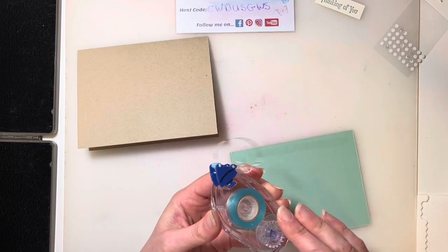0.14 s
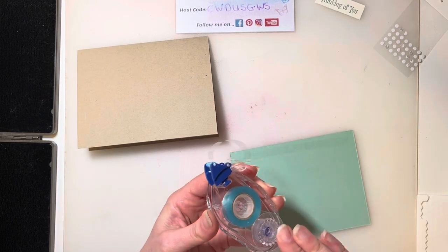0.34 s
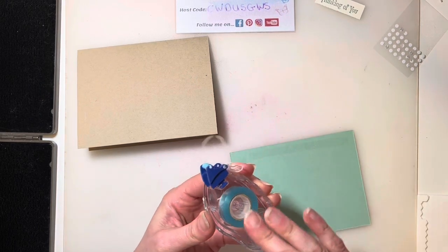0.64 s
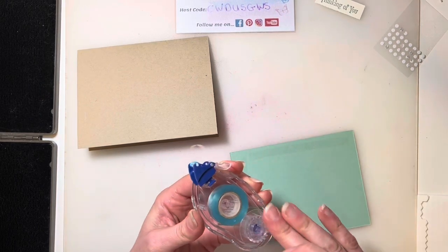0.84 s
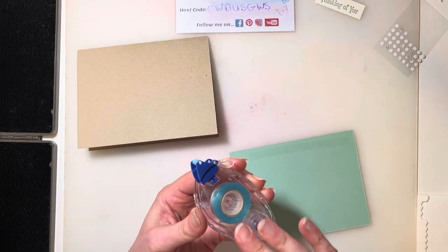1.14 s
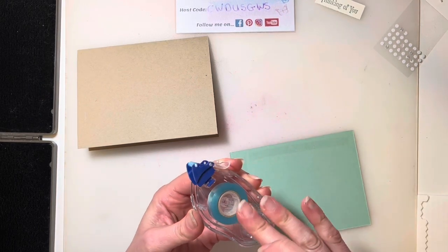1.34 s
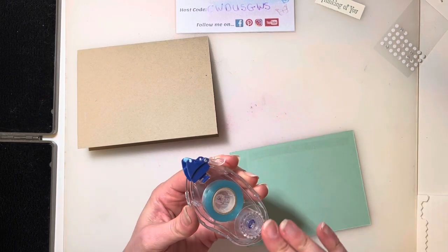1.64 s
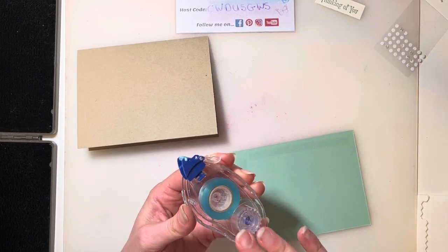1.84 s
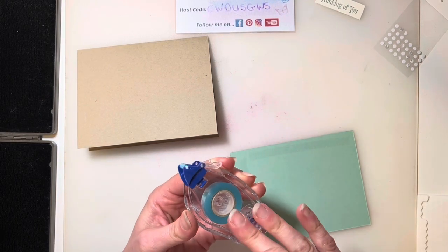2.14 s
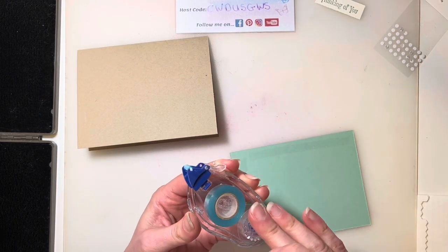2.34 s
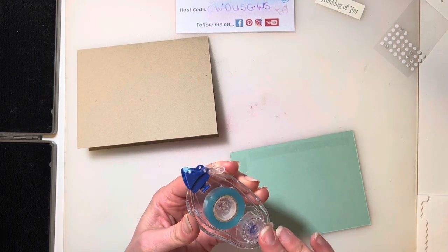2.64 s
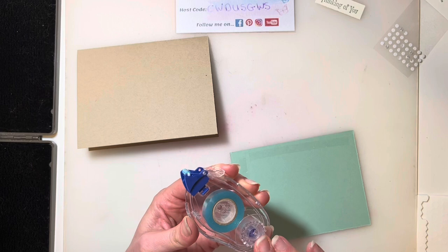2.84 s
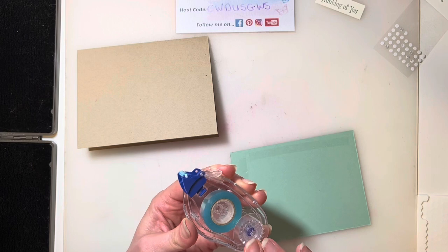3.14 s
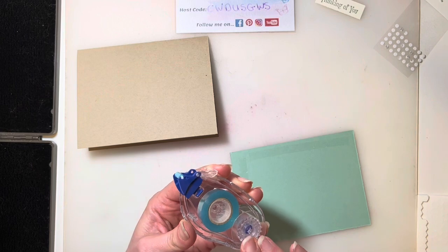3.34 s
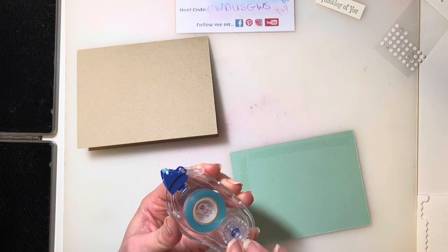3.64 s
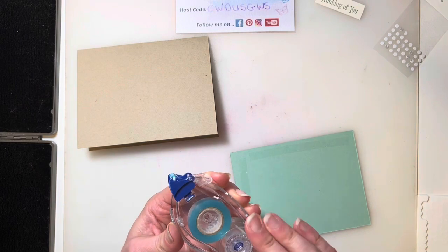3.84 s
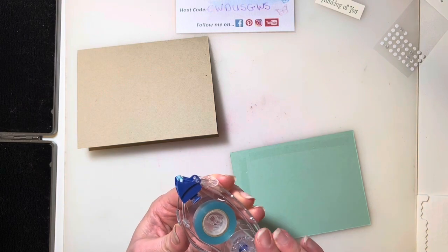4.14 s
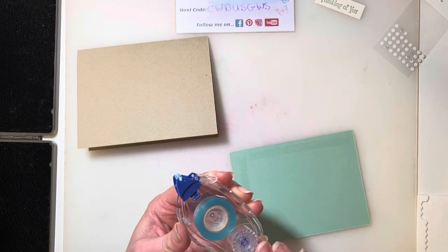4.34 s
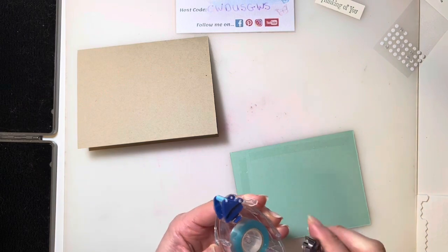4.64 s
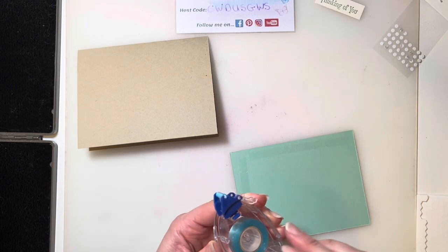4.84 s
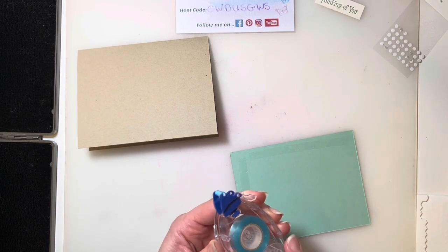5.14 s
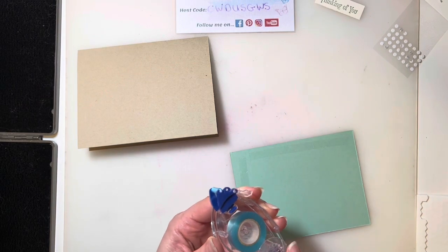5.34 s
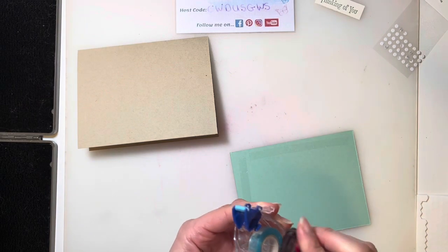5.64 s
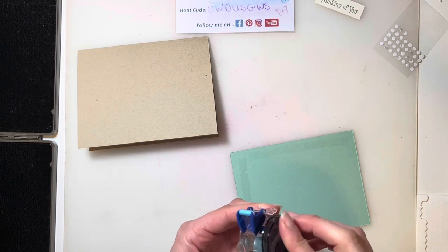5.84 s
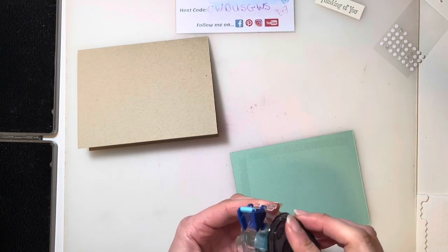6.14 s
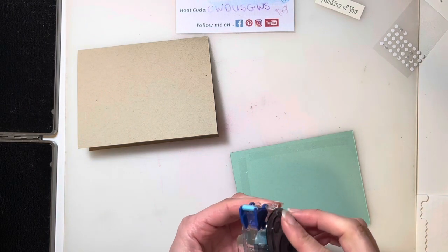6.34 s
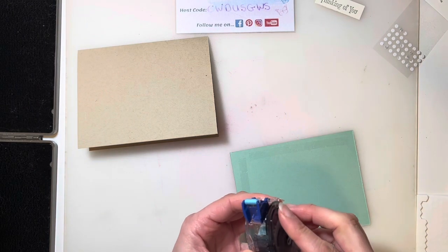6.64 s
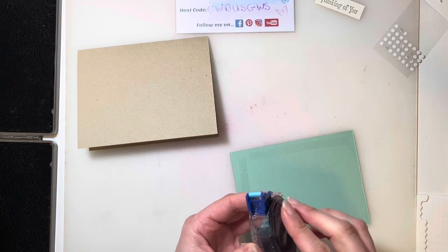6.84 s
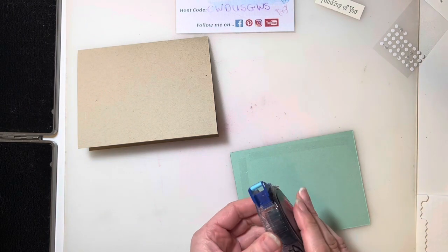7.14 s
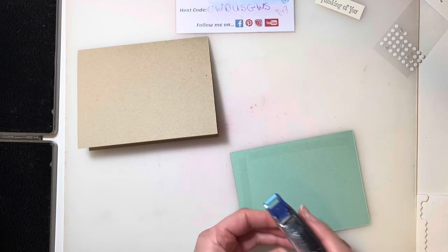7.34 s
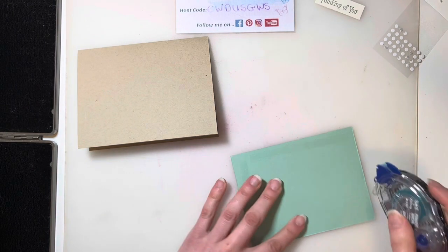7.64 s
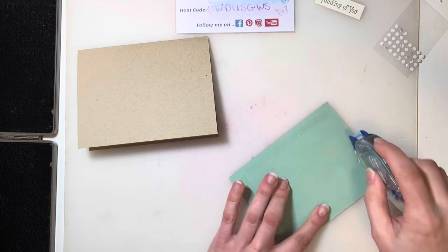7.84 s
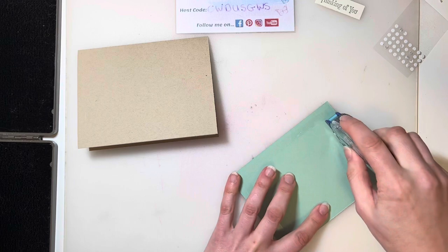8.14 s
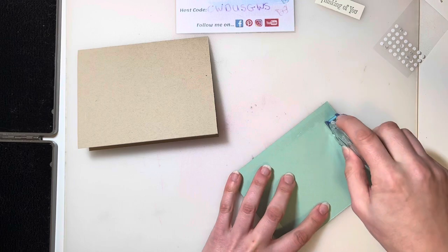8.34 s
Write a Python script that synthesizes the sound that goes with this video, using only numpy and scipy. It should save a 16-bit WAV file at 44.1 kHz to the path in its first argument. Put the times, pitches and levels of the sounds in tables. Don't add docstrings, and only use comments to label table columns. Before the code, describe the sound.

A close stereo microphone over a desk in a small, still room, with faint airy noise and a distant low motor hum throughout. After two light finger ticks, from 0.2 to 2.0 seconds a plastic toothed wheel is spun in three nearly continuous runs, some fifteen to seventy milliseconds between crisp, bright, very short clicks, with soft skin rubbing. From 2.2 to 3.3 the clicks slow into irregular single steps, then leave gaps. A few more come around 3.9 to 4.3, with shell taps near 4.6, and harder clicks at 5.1 to 5.35. From 5.6 to 6.6 nails scrape and pry the case while loose bits rattle; it gives with a sharp crack at 6.97. At 7.16 the halves snap shut, the loudest event. Card slides and faintly squeaks around 7.6 to 8.2, a soft thud follows at 8.2, then dull boxy ratchet clicks, rasping and low pushes to the end.

```python
import sys
import numpy as np
from scipy import signal
from scipy.fft import rfft, irfft
from scipy.io import wavfile
from scipy.ndimage import uniform_filter1d

SR = 44100
rng = np.random.default_rng(int(sys.argv[2]) if len(sys.argv) > 2 else 0)


def natural_amplitude(level_db):
    exponent = np.asarray(level_db, float) / 20
    return 10 ** exponent


def dump(signal):
    limited = np.clip(np.atleast_2d(signal).T, -1, 1)
    pcm = np.round(limited * 32767).astype(np.int16)
    wavfile.write(sys.argv[1], SR, pcm)


N = 374850


def evened(x):
    return x / np.sqrt(np.mean(x ** 2) + 1e-20)


def read(points, hz):
    f, value = np.transpose(points)
    return np.interp(np.log(hz + 1), np.log(f + 1), value)


def coloured(x, points):
    hz = np.fft.rfftfreq(x.shape[-1], 1 / SR)
    shaped = rfft(x) * natural_amplitude(read(points, hz))
    return evened(irfft(shaped, x.shape[-1]))


def drift(per_s):
    knots = rng.standard_normal(int(N / SR * 40) + 2)
    return np.interp(np.arange(N) / SR * np.clip(per_s, .1, 39), np.arange(len(knots)), knots)


def above(x, low_hz):
    return signal.sosfilt(signal.butter(N=4, Wn=low_hz, btype="high", fs=SR, output="sos"), x)


def place(times, db, sounds):
    length = sounds.shape[1]
    out = np.zeros(N + length)
    at = np.round(np.asarray(times) * SR).astype(int)[:, None] + np.arange(length)
    loudest = np.sqrt(2 * uniform_filter1d(sounds ** 2, size=24).max(1))
    np.add.at(out, at, sounds * (natural_amplitude(db) / loudest)[:, None])
    return out[:N]


def strike(times, db, modes, pitch=1, detune=0.0076, vary_db=3.5, chatter_s=0.00021, size=2000):
    hz, mode_db, t60 = np.transpose(modes)[:, None, :, None]
    tune, gain = rng.standard_normal((len(times), len(modes), 1, 2)).transpose(3, 0, 1, 2)
    t = np.arange(size) / SR
    sides = (-1.) ** np.arange(len(modes))[:, None]
    hz = hz * np.reshape(pitch, (-1, 1, 1)) * (1 + detune * tune)
    envelope = natural_amplitude(mode_db + vary_db * gain - 60 * t / t60)
    rings = (envelope * sides * np.sin(2 * np.pi * hz * t)).sum(1)
    contact = rng.standard_normal((len(times), 600)) * np.exp(-np.arange(600) / SR / chatter_s)
    return place(times, db, signal.fftconvolve(rings, contact, axes=1))


def crack(times, db, decay_s, low_hz):
    burst = rng.standard_normal((len(times), 800)) * np.exp(-np.arange(800) / SR / decay_s)
    return place(times, db, above(burst, low_hz))


# (frequency [Hz], rms level [dB], pitch wander [Hz])
HUM = [(36.8, -56.5, 4.1), (62.4, -50.5, 1.5), (120.8, -64.5, 4.1), (233.6, -72, 6.9)]


def hum():
    out = np.zeros(N)
    for hz, db, wander_hz in HUM:
        turns = np.cumsum(hz + wander_hz * drift(10.0)) / SR
        out += natural_amplitude(db + 1.0 + 0.65 * drift(7.9)) * np.sin(2 * np.pi * turns)
    return out


# (frequency [Hz], level per Hz [dB])
AIR = [(15, -26.5), (25, -4), (60, 2), (95, -3), (120, -10), (200, -7), (235, -4.5), (300, -15.5),
       (380, -11.5), (650, -20), (1300, -26.5), (3000, -33.5), (7000, -46), (15000, -58.5)]
# (frequency [Hz], likeness [0-1])
AIR_SAME = [(60, 1), (130, 0.75), (300, .8), (1000, 0.075), (4000, 0.34), (10000, 0.2)]


def air():
    a, b = rfft(rng.standard_normal((2, N)))
    same = np.clip(read(AIR_SAME, np.fft.rfftfreq(N, 1 / SR)), 0, 1)
    pair = irfft(np.array([a, same * a + np.sqrt(1 - same ** 2) * b]), N)
    return natural_amplitude(-56.5) * coloured(pair, AIR)


# (time [s], blow level [dB], shell pitch [Hz])
TAPS = [(0.1166, -37.5, 3100), (0.1734, -37, 3050), (3.6449, -39, 2900), (3.823, -47.5, 4400),
        (3.842, -41.5, 3040), (3.881, -51.5, 6200), (4.05, -57, 6160), (4.563, -36.5, 3590),
        (4.5748, -31, 3870), (4.8974, -47, 2570), (4.9222, -50, 2950), (5.4644, -30.5, 2960),
        (7.3371, -40.5, 1430), (7.3823, -34.5, 1430), (7.39, -45, 1380), (8.257, -47, 1397),
        (7.6211, -56, 2010), (7.887, -50, 3250), (8.205, -28.5, 1450), (8.305, -55.5, 2470)]
# (time [s], blow level [dB], shell pitch [Hz], brightness [dB])
PRYING = [(5.601, -41, 3400, -29), (5.611, -39.5, 3570, -27), (5.852, -48.5, 1950, -41),
          (5.865, -47, 2050, -27), (6.049, -48, 2190, -28), (6.091, -46, 2160, -34), (6.31, -55, 2080, -32),
          (6.548, -47, 4600, -30), (5.693, -31.5, 2430, -16), (5.714, -29, 2370, -31),
          (5.7538, -25, 2640, -26), (5.768, -26.5, 2060, -19), (5.7774, -27.5, 3900, -25),
          (5.7947, -30.5, 2470, -31), (5.806, -39, 2120, -29), (5.916, -41.5, 2260, -36),
          (6.0404, -47, 2530, -16), (6.074, -34, 2200, -30), (6.127, -32, 2300, -26),
          (6.208, -30.5, 2210, -6), (6.327, -31, 2220, -32), (6.341, -29.5, 2070, -38),
          (6.347, -27, 2430, -23), (6.4016, -30.5, 2240, -27), (6.416, -21, 2480, -0.5),
          (6.4275, -25.5, 4330, -27), (6.5044, -32, 2500, -35), (6.543, -42, 2340, -11),
          (6.572, -27.5, 2080, -19), (6.606, -48, 2160, -35), (6.7227, -50, 2010, -29),
          (6.9692, -20.5, 3770, -16), (6.9721, -15, 2110, -16.5), (6.9777, -23.5, 1630, -8)]
# (multiple of shell pitch [ratio], level [dB], t60 [s])
SHELL = [(0.8, -6, .008), (1.001, 4.5, .008), (1.25, -12.5, .007), (1.602, -11, 0.007), (2.0, -14.5, .005),
         (2.602, -25, 0.0033)]
# (frequency [Hz], level [dB], t60 [s])
GRIP = [(576, -4.5, 0.017), (934, -4.5, 0.016), (1450, -4, 0.026)]
# (time [s], level [dB])
KNOCKS = [
    (.347, -36.5),
    (.655, -38.5),
    (.787, -38.5),
    (1.841, -42.5),
    (2.385, -42),
    (5.308, -42),
    (5.346, -39.5),
    (6.415, -37.5),
    (6.97, -40.5),
]


def handling():
    tap_bright_db = -20
    blows = PRYING + [(*tap, tap_bright_db) for tap in TAPS]
    s, blow_db, shell_hz, bright_db = np.transpose(blows)
    scratch = crack(s, blow_db - 1, .003, 1800)
    dulled = signal.lfilter(*signal.butter(N=2, Wn=5000., fs=SR), scratch)
    bright = crack(s, blow_db + bright_db, 0.0027, 5800)
    shell = above(strike(s, blow_db - 3.5, SHELL, shell_hz, chatter_s=0.0026, size=1000), 1400)
    knock = above(strike(s, blow_db - 28, GRIP, detune=0.059, size=900), 380)
    jolt_s, jolt_db = np.transpose(KNOCKS)
    jolt = above(strike(jolt_s, jolt_db, GRIP, pitch=.68, detune=0.11, size=900), 250)
    return jolt + knock + shell + dulled + bright


# (start [s], length [s], effort [dB], hiss over scuff [dB])
STROKES = [(0.136, 1.83, -63, -1.5), (2.154, 0.96, -78.5, -1.5), (3.63, 0.031, -69, -12.5),
           (3.812, 0.69, -82, 6.5), (4.532, 0.095, -66.5, -14.5), (5.079, 0.51, -70, -4.5),
           (5.717, 0.071, -57, -12.5), (5.91, 0.37, -70, -14), (6.33, 0.073, -60, -15),
           (6.521, 0.069, -57, -13.5), (6.79, 0.715, -64.5, -5.5), (7.635, 0.17, -63.5, 5.5),
           (7.892, 0.11, -64, -12), (8.198, 0.11, -59, -27), (8.358, 0.19, -47, -11)]


def effort(t):
    rise_db_per_s, fall_db_per_s = 416, 169
    start, length, db, hiss_db = np.transpose(STROKES)[:, :, None]
    early_s, late_s = np.maximum(start - t, 0), np.maximum(t - start - length, 0)
    db = db - rise_db_per_s * early_s - fall_db_per_s * late_s
    return np.sqrt((natural_amplitude(db) ** 2).sum(0)), np.sqrt((natural_amplitude(db + hiss_db) ** 2).sum(0))


# (frequency [Hz], level per Hz [dB])
RUB_DULL = [(300, -20.5), (900, 0), (1500, -0.5), (2300, 2), (4000, -1.5), (7000, -17.5), (10000, -34)]
# (frequency [Hz], level per Hz [dB])
RUB_HISS = [(1500, -18), (4000, -5), (9000, 0.5), (14000, -5.5), (16000, 4.5)]


def rubbing():
    t = np.arange(N) / SR
    coarse_t = t[::64]
    scuff_gain, hiss_gain = (np.interp(t, coarse_t, gain) for gain in effort(coarse_t))
    grit = rng.standard_normal((2, N)) * natural_amplitude(2.0 * drift(38))
    hiss = hiss_gain * natural_amplitude(4.5) * coloured(grit[0], RUB_HISS)
    scuff = scuff_gain * natural_amplitude(-3.0) * coloured(grit[1], RUB_DULL)
    return hiss + scuff


# (time [s], strength [dB], case over pawl [dB], frame over pawl [dB], wheel over pawl [dB])
FIRST_TURN = [(0.1989, 3, -0.5, -9.5, -2.5), (0.2213, -2.5, 0, -14.5, 2.5), (0.247, 3, -0.5, -19.5, -8),
              (0.284, 2, -6, -8, -3), (0.3458, 2, 0, 1.5, -2.5), (0.377, -4, -27.5, -4.5, 3.5),
              (0.4073, 0, -16, -9.5, 1.5), (0.428, -2.5, -5, -4.5, -0.5), (0.444, 0.5, 3.5, -9.5, 4.5),
              (0.4575, -0.5, 0.5, -0.5, -0.5), (0.4724, 0.5, 1, -8.5, -5), (0.4923, 1, -15, 0, -5),
              (0.5132, -3, -4.5, -12.5, -2.5), (0.537, 0, -17, -4, -0.5), (0.559, -2.5, -9, -6, 5),
              (0.579, -1, -10, -22.5, 1), (0.5945, -3.5, -29, -3.5, -5.5), (0.61, -0.5, -19, -30, 1.5),
              (0.6244, -2.5, -22.5, -3.5, -3), (0.6376, 0, -22, -4.5, -4), (0.6513, 2, -10.5, -9.5, -7.5),
              (0.6685, 1, -7.5, -7, -9), (0.688, -1.5, -1.5, -2, -8.5), (0.7086, -3.5, -11.5, -2.5, -1),
              (0.7325, -1, -4, -8.5, 2)]
SECOND_TURN = [(0.7606, 1, -13.5, -1, -0.5), (0.7858, -2, -5, 2.5, -5.5), (0.804, 0.5, -1, 1, -2),
               (0.8189, 1, 3, -9, 1), (0.8324, -0.5, 0, -1.5, -5), (0.8453, 2.5, -5.5, -11, -9.5),
               (0.859, -0.5, 1.5, -11.5, -2), (0.875, -5, -4.5, -16.5, 0.5), (0.8926, 1, -6, -14, -7.5),
               (0.9143, 2.5, -7.5, -20.5, -7), (0.9384, -1.5, -5, -8, -3.5), (0.9605, 0, -1, -9, -5),
               (0.9774, 1, -7.5, -8.5, 1), (0.9925, 1.5, 5.5, -8.5, -4), (1.005, -0.5, -5, 0.5, -1.5),
               (1.0149, -3, 6, -4, 1.5), (1.0278, 2.5, -2, -3.5, -3.5), (1.043, 1.5, -3, -11, -18),
               (1.057, 0, -25, -4.5, -2.5), (1.0744, 2, -18, -10, -3), (1.095, -3, -24, -6, 0.5),
               (1.1124, 0, -16.5, -12.5, 2), (1.1278, 2.5, -18, -7, -1.5), (1.1403, 1, -14, -6.5, -1),
               (1.152, 3, -18, -9.5, -4.5), (1.164, 2, -6, -11, -10), (1.177, 1, -7.5, -9.5, -6.5),
               (1.24, 1.5, -7, -2, -1), (1.3059, 2.5, -16.5, -22, -5)]
THIRD_TURN = [(1.343, 1, -5, -5, -6), (1.3655, 1.5, -12, -5.5, -5.5), (1.3851, -1, -6.5, -8, -5),
              (1.4079, 1, -13, -2, -5.5), (1.4316, 1, -8, -6, -1.5), (1.46, 2.5, -7, -3, -4),
              (1.4858, 2, -5.5, -4.5, -3), (1.5067, -3, -1, 6.5, -6.5), (1.5232, 1, 1.5, -12, 0.5),
              (1.5382, -1, -3, -10, -15.5), (1.5527, 1, -6.5, -14, -2.5), (1.5692, -2, -6.5, -8, -4),
              (1.5893, 1.5, -12.5, -15.5, -7), (1.6161, 1, -13, -20, -8), (1.644, -2, -2, -17, -0.5),
              (1.6693, -1, 0, -11, -1), (1.6911, 1, 1.5, -8, -0.5), (1.7091, -1, -2, -18, 2),
              (1.7262, 5, -5, -11.5, -9.5), (1.7449, -3, 4, -6, 0.5), (1.7714, 2.5, -6, -15, -7.5),
              (1.8095, 2, -9, -32, -7.5), (1.8388, 0, -5.5, -19, -4), (1.8588, 1.5, -12, -12, -2),
              (1.8742, 1.5, -28, -12, -2.5), (1.89, -3, -6, -6, 0), (1.906, 0.5, -14, -6.5, -9),
              (1.9225, -0.5, -13, -2, -3.5), (1.9399, 1.5, -7, -6, -1), (1.958, -4.5, -3.5, 2.5, -9)]
LATER_TEETH = [(2.1784, -1.5, 2.5, 1, -0.5), (2.2587, 0, -3.5, -0.5, -0.5), (2.2896, 0.5, -5.5, -1, -2.5),
               (2.3239, 2, -9, -2.5, -1), (2.3523, -2, 3, 3, 3), (2.3844, 0.5, 0.5, -3.5, -2.5),
               (2.4189, -1.5, -2.5, 0, 2.5), (2.4539, 1, -5.5, -7, -5.5), (2.4973, -1.5, -4, -11, -1),
               (2.5467, -2, -3, -19, -2.5), (2.6077, 3, -12.5, -23, -6.5), (2.7696, -0.5, -10.5, -14.5, -8),
               (2.8579, 1, -9.5, -19, -3.5), (2.927, 1, -6, -7, -4), (2.9862, 1, -4.5, -1, 0),
               (3.325, -2, -11, -5.5, -5), (3.933, 1, -14, -11, -4), (4.1204, 2, -16.5, -18, -7.5),
               (4.1966, 1, -15, -13, -4.5), (4.219, -2.5, -2.5, -9, 4), (4.244, -1.5, -4.5, -5, 2),
               (4.2696, 1, -9, -12, -3), (4.3249, 2, -12.5, -12, -6), (5.0787, 5.5, -13.5, -6, -17),
               (5.1141, 3.5, -5.5, -6.5, -13), (5.15, 8.5, -8, -17, -24), (5.2432, 5, -5, -8.5, -10),
               (5.307, 6, -10.5, -9.5, -12), (5.3456, 6, -8, -16, -23), (8.3265, -7.5, -1.5, -4, -3),
               (8.357, -2.5, -4.5, -4, -12), (8.3829, -2.5, -1.5, -3, -12.5),
               (8.4156, -4.5, -0.5, -1.5, -11), (8.44, -1, -2.5, -8.5, -14)]
# (frequency [Hz], level [dB], t60 [s])
CASE = [(2050, -13, .005), (2650, -4, .005), (2990, 1.5, .006), (3330, -2, .005)]
# (frequency [Hz], level [dB], t60 [s])
FRAME = [(3630, 2, 0.0038), (4110, -4, 0.009), (4450, -1, 0.0064), (5150, -3, 0.0042)]
# (multiple of wheel pitch [ratio], level [dB], t60 [s])
WHEEL = [(.76, -9, 0.0026), (.86, -5, 0.0062), (.95, 0, 0.0053), (1.028, 0.5, .006), (1.1, -1, 0.0074),
         (1.2, -12, 0.0068)]
# (frequency [Hz], level [dB], t60 [s])
PAWL = [(8900, -4, 0.0043), (10550, -9, .004), (11620, -9.5, 0.0043), (12750, -4.5, 0.004),
        (13670, 0, 0.003), (14090, -5.5, 0.0053), (14700, -4, 0.004), (15620, -6, 0.004)]
# (frequency [Hz], level [dB], t60 [s])
CARD = [(230, -10, 0.12), (546, -12, 0.029), (1231, -2.5, 0.022), (1516, 0, 0.037), (2738, -1.5, 0.027)]
# (time [s], pitch [Hz])
WHEEL_HZ = [(.2, 7870), (.42, 7170), (.54, 7940), (.62, 7200), (.82, 7770), (1.0, 7450), (1.1, 7900),
            (1.4, 6900), (1.52, 8150), (1.7, 6980), (1.88, 7750), (2.0, 6920), (2.35, 7950), (2.6, 6940),
            (3.0, 7830), (4.2, 7370), (5.1, 7360), (8.4, 6590)]
# (time [s], level over the case ring [dB])
BELLY = [(.2, -9), (2.0, -12), (2.5, -5), (4.4, -4), (5.0, 1.5), (8.4, -7)]


def ratchet():
    teeth = FIRST_TURN + SECOND_TURN + THIRD_TURN + LATER_TEETH
    s, strength_db, case_over, frame_over, wheel_over = np.transpose(teeth)
    turned = (s > 4.8) & (s < 5.6)
    rolled = s > 8
    s = s + np.where(turned, .0007, .00026)
    case_db = strength_db + case_over - 19.5
    frame_db = strength_db + frame_over - 19.5
    wheel_db = strength_db + wheel_over - 11
    belly_db = case_db + np.interp(s, *np.transpose(BELLY))
    knock_db = strength_db + np.maximum(case_over, frame_over) - 46
    card_db = (strength_db + case_over)[rolled] - 25.0
    wheel_hz = np.interp(s, *np.transpose(WHEEL_HZ))
    pawl_pitch = np.where(turned, .91, 1)

    click = crack(s, strength_db - 26.0 + 3.9 * turned, 0.00063, 3000)
    card = strike(s[rolled] + 0.00079, card_db, CARD, chatter_s=0.0029)
    case = strike(s + .0002, case_db, CASE, detune=0.025, vary_db=2, chatter_s=0.00002, size=900)
    belly = strike(s + 0.00018, belly_db, [(2390, 0, .0075)], detune=.02, chatter_s=0.00002, size=900)
    frame = strike(s + .0002, frame_db, FRAME, detune=.03, vary_db=1.5, chatter_s=0.00002, size=600)
    knock = strike(s, knock_db, GRIP, detune=0.1, vary_db=0.5, size=1500)
    wheel = strike(s, wheel_db, WHEEL, wheel_hz, detune=.015, vary_db=1.5, chatter_s=0.00025, size=500)
    pawl = strike(s, strength_db - 16.5, PAWL, pawl_pitch, detune=.015, vary_db=1.5,
                  chatter_s=0.0004, size=400)
    body = above(case + belly, 1700) + above(frame, 3000) + above(knock, 460)
    return click + body + above(wheel + pawl, 4800) + card


def rattle():
    start_s, end_s, grains_per_s = 5.65, 6.65, 93
    pitch_hz, spread = 1960, 0.12
    count = round(grains_per_s * (end_s - start_s))
    where, size, tune = rng.random((count, 3)).T
    s = start_s + (end_s - start_s) * where
    effort_db = 2.0 * (20 * np.log10(effort(s)[0]) + 59) - 59
    db = effort_db + 9 - 3.26 * np.log(size + 1e-3)
    hz = pitch_hz * np.exp(spread * 4 * (tune - .5) ** 3 + spread * tune)
    return above(strike(s, db, SHELL, hz, chatter_s=0.00068, size=700), 1800)


# (time [s], low halves level [dB], latch level [dB])
SNAP = [
    (7.1595, -27, -36),
    (7.1622, -6, -15),
    (7.168, -19, -4.5),
    (7.1703, -21, -10),
    (7.177, -24, -24),
]
# (frequency [Hz], level [dB], t60 [s])
HALVES = [(1180, -16, .02), (1445, 1, .034), (1630, -7, .05), (1798, -4, .026), (2050, -9, .02),
          (2330, -3, .018)]
# (frequency [Hz], level [dB], t60 [s])
LATCH = [(2950, -10, .009), (3600, -4, .01), (3850, 0, .01), (4200, 0, .009), (4800, -4, .009),
         (5700, -9, .007), (7000, -15, .005)]
# (frequency [Hz], level [dB], t60 [s])
LID = [(650, -9.5, 0.017), (880, -3.5, 0.11), (1190, 0.5, 0.018)]


def snap():
    s, low_db, latch_db = np.transpose(SNAP)
    halves = strike(s, low_db - 3.5, HALVES, detune=0.0036, vary_db=2.2, chatter_s=0.00008, size=4000)
    latch = strike(s, latch_db - 1.5, LATCH, detune=.01, vary_db=1.5, chatter_s=.00003)
    lid = strike([7.1685], -22, LID, detune=.003, vary_db=1.0, chatter_s=.0001, size=4000)
    click = crack(s, latch_db - 12, 0.01, 2000)
    return above(halves, 770) + above(lid, 480) + above(latch, 1600) + click


# (time [s], level [dB], pitch [Hz])
THUDS = [
    (7.179, -36.5, 190),
    (7.205, -44.5, 216),
    (8.201, -30.5, 125.7),
    (8.219, -31.5, 82.5),
    (8.269, -38.5, 82.4),
    (8.344, -36.5, 115),
    (8.371, -35.5, 128.5),
    (8.396, -43, 113),
    (8.431, -35, 119),
    (8.445, -42, 189),
]


def desk():
    s, db, hz = np.transpose(THUDS)
    swing = [(1.0, -8.5, 0.13), (1.9, -13.5, 0.034), (3.7, -13, 0.015)]  # (pitch ratio, level [dB], t60 [s])
    return strike(s, db, swing, hz, chatter_s=0.0025, size=4000)


# (frequency [Hz], width [Hz], level [dB])
SQUEAK = [(2050, 50, -67.5), (3090, 110, -62.5), (4270, 100, -69)]


def squeak():
    start_s, end_s = 7.9, 8.17
    t = np.arange(N) / SR
    fade = np.clip((t - start_s) / 0.011, 0, 1) * np.clip((end_s - t) / 0.04, 0, 1)
    lines = np.zeros(N)
    for hz, width_hz, db in SQUEAK:
        line = signal.lfilter(*signal.iirpeak(hz, hz / width_hz, SR), rng.standard_normal(N))
        lines += natural_amplitude(db) * evened(line)
    return fade * natural_amplitude(5 * drift(30) - 8) * lines


# (frequency [Hz], level [dB])
SWAY = [(500, -9), (2500, -17), (4000, -11), (6000, -7), (7500, -15), (8600, -17), (10200, -11),
        (13500, -14), (15600, -8)]


def sway(x):
    hz = np.fft.rfftfreq(N, 1 / SR)
    shifted = irfft(1j * rfft(x * drift(40)) * natural_amplitude(read(SWAY, hz)), N)
    return np.array([shifted, -shifted])


# (delay [s], level [dB])
ECHOES = [
    (.0025, -11.5),
    (.0085, -19),
    (0.0178, -21.5),
]


def echoes(x):
    taps = np.zeros((2, 1200))
    for delay_s, db in ECHOES:
        at = round(delay_s * SR)
        smear = rng.standard_normal(40) + .07 * rng.standard_normal((2, 40))
        taps[:, at:at + 40] += natural_amplitude(db) * smear / np.linalg.norm(smear[0])
    return signal.oaconvolve(x[None], taps, axes=1)[:, :N]


# (frequency [Hz], t60 [s])
ROOM = [(500, 0.083), (1500, 0.23), (3000, 0.18), (7000, 0.22), (8800, 0.083), (11000, 0.17), (13500, 0.13),
        (15000, 0.03)]
# (frequency [Hz], likeness [0-1])
ROOM_SAME = [(500, .3), (3000, .4), (5500, .4), (7500, .99), (9600, .995), (12000, .95), (15000, .97)]


def room(x):
    out, t = np.zeros((2, N)), np.arange(N) / SR
    for k in range(3):
        hz, lag, (a, b) = signal.stft(rng.standard_normal((2, SR // 2)), SR, nperseg=128)
        same = np.clip(read(ROOM_SAME, hz), 0, 1)[:, None]
        pair = np.array([a, same * a + np.sqrt(1 - same ** 2) * b])
        decay = natural_amplitude(-60 * lag / read(ROOM, hz)[:, None])
        tail = signal.istft(pair * decay, SR, nperseg=128)[1]
        tail *= np.clip(np.arange(tail.shape[1]) / SR / 0.00077, 0, 1)
        feed = x * np.sqrt(2 / 3) * np.cos(2 * np.pi * 61 * t + k * np.pi / 3)
        out += signal.fftconvolve(feed[None], tail / np.linalg.norm(tail[0]), axes=1)[:, :N]
    return natural_amplitude(-10.5) * out


def scene():
    hits = ratchet() + handling() + rattle() + snap()
    space = sway(hits) + echoes(hits) + room(hits)
    return hits + space + hum() + air() + rubbing() + desk() + squeak()


def top_cut(x):
    return signal.sosfilt(signal.butter(12, 17140, fs=SR, output="sos"), x)


# (frequency [Hz], lead [rad])
PORT_LEAD = [(0, 0), (900, .3), (2000, .5), (3000, 1.1), (4800, .8), (5500, -.4), (7800, -2.9),
             (9450, -3.5), (11000, -5.9), (12500, -6.6), (15200, -9.3), (16500, -9.45)]
# (frequency [Hz], left over right [dB])
PORT_DB = [(60, -.5), (750, 2.5), (1300, -1.5), (2400, 1.5), (4400, 2), (8000, 0), (15000, 0)]
# (frequency [Hz], level [dB])
EDGE = [(15000, 0), (15800, -5), (16500, -10), (16900, -24), (17150, -55)]


def record(dry):
    hz = np.fft.rfftfreq(N, 1 / SR)
    lead_hz, lead = np.transpose(PORT_LEAD)
    half = np.exp(.5j * np.interp(hz, lead_hz, lead)) * natural_amplitude(read(PORT_DB, hz) / 2)
    ports = np.array([half, 1 / half])
    mix = irfft(rfft(dry) * natural_amplitude(read(EDGE, hz)) * ports, N)
    return top_cut(mix)


dry = scene()
out = record(dry)
dump(out)
```